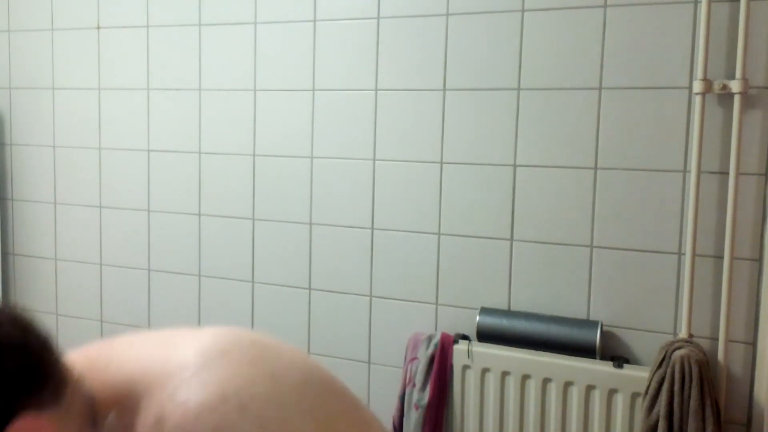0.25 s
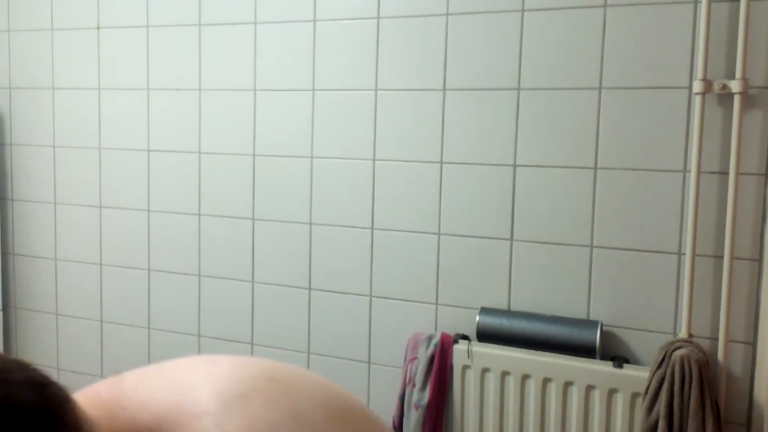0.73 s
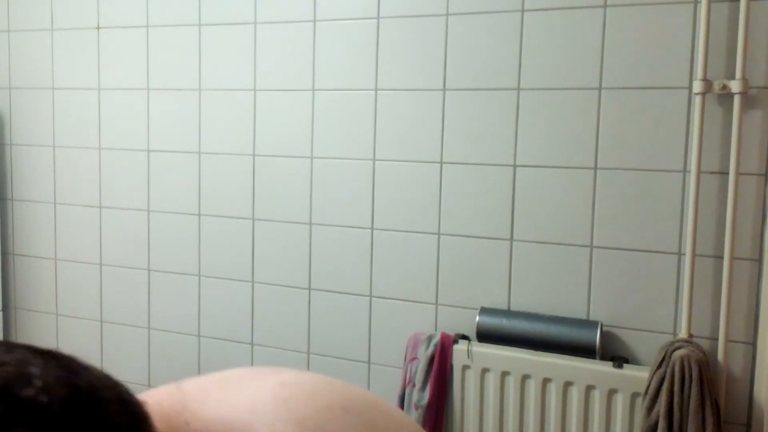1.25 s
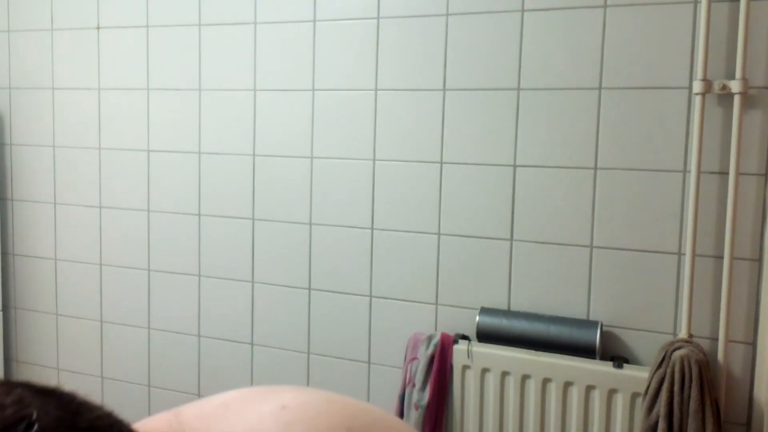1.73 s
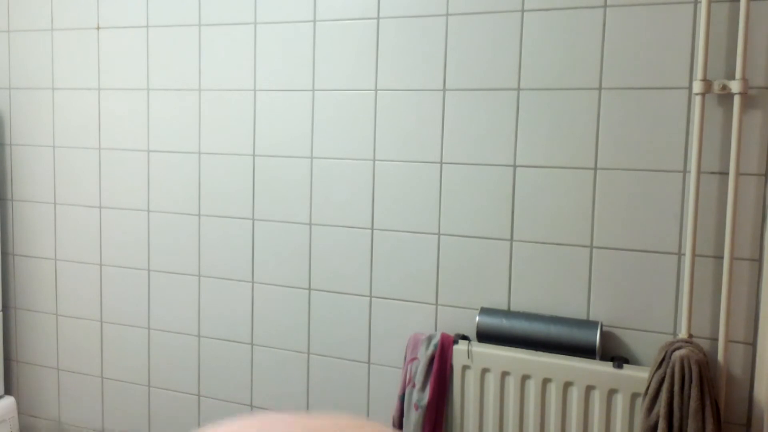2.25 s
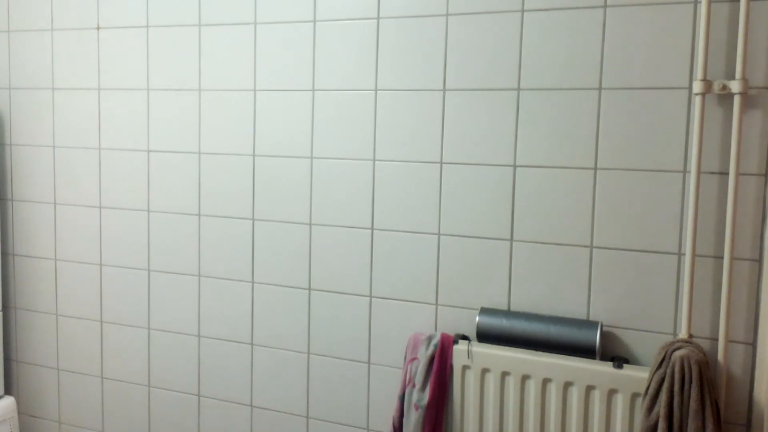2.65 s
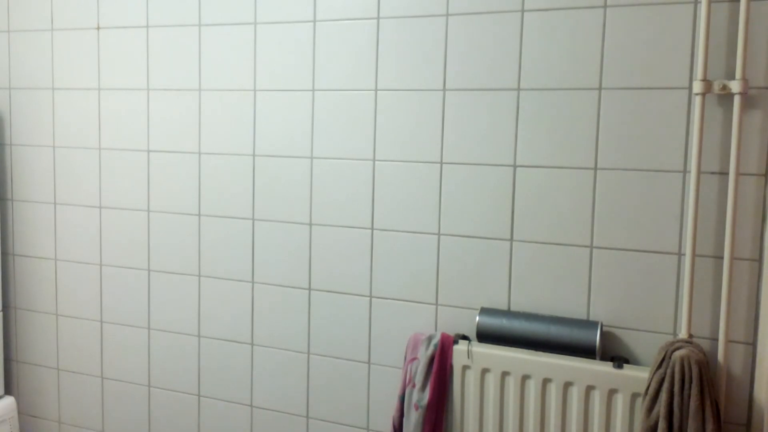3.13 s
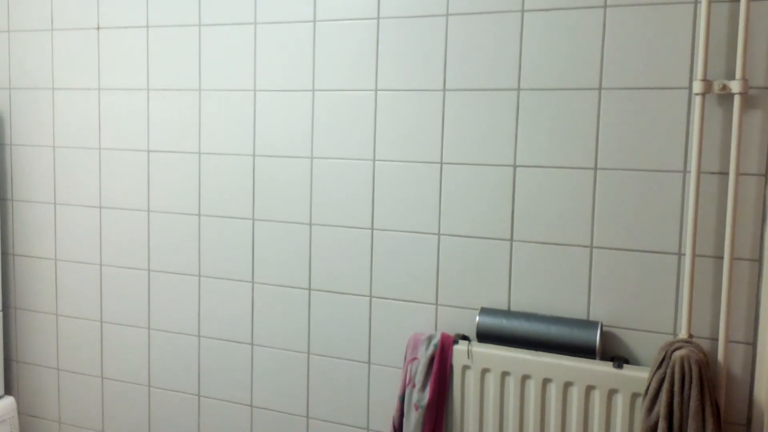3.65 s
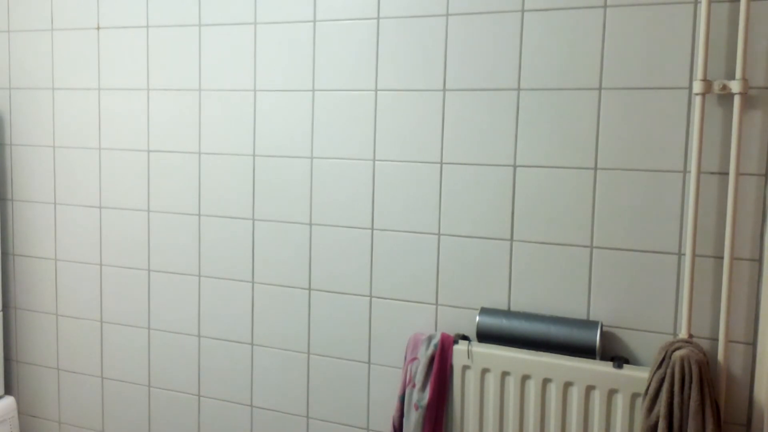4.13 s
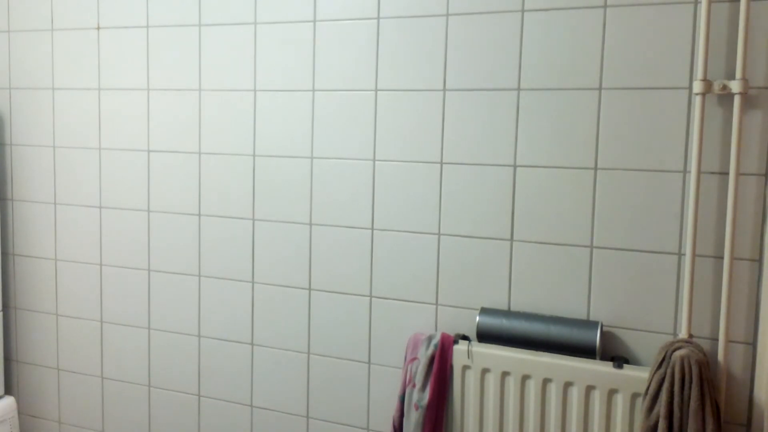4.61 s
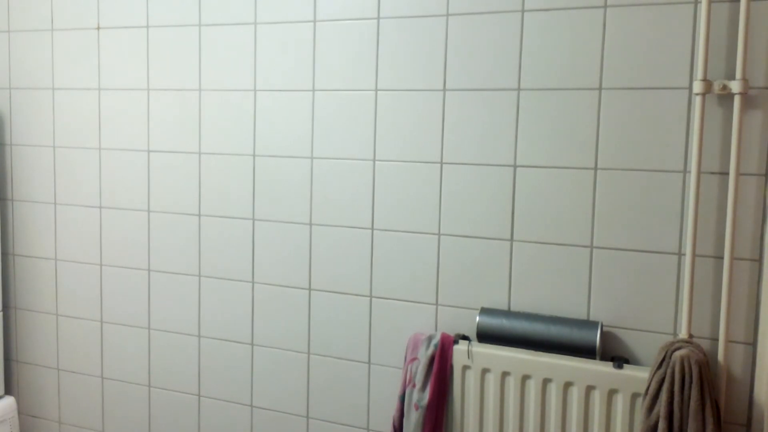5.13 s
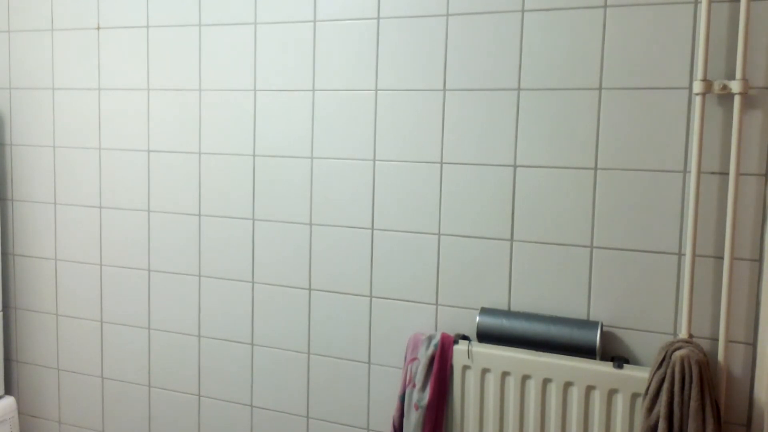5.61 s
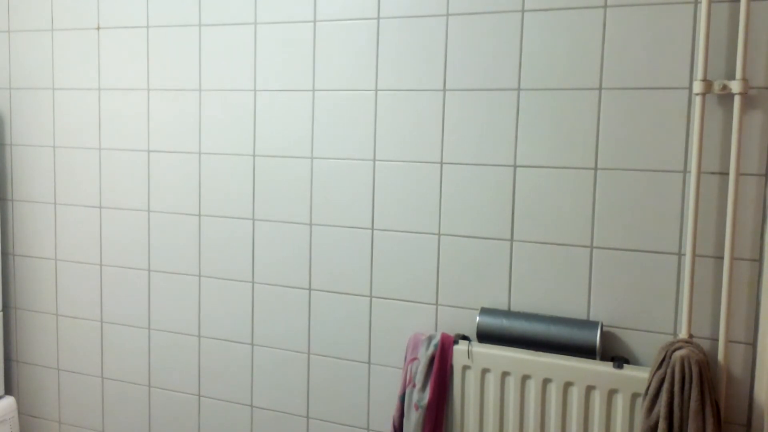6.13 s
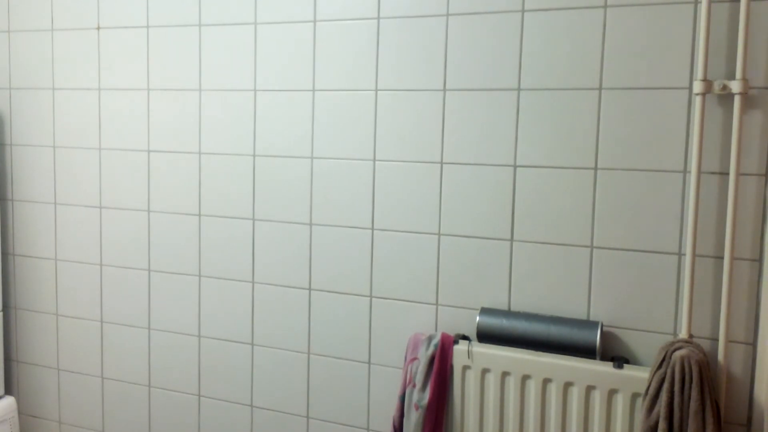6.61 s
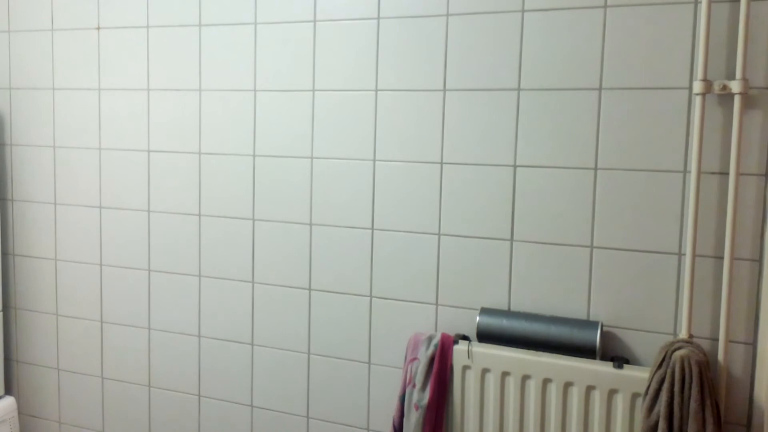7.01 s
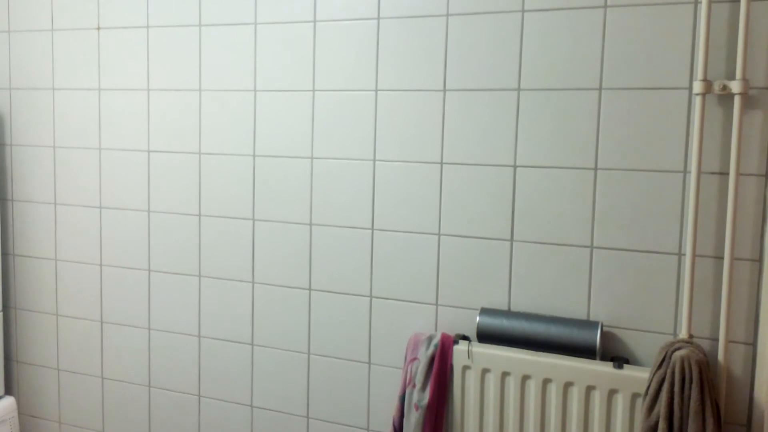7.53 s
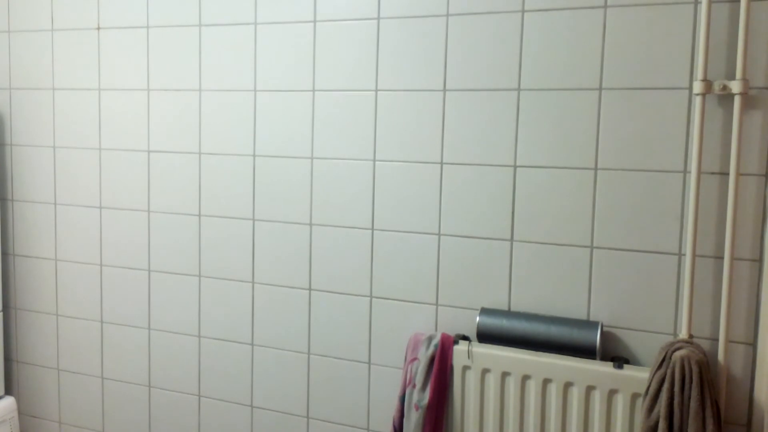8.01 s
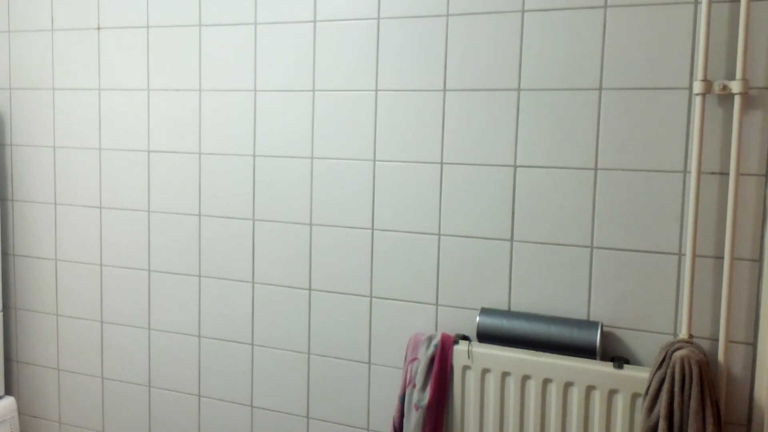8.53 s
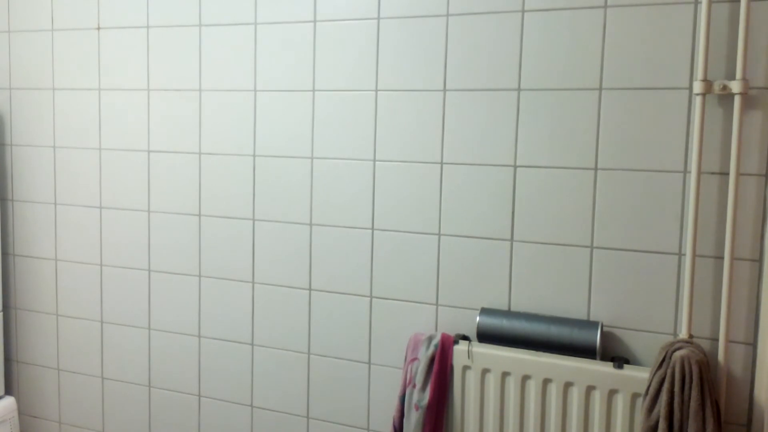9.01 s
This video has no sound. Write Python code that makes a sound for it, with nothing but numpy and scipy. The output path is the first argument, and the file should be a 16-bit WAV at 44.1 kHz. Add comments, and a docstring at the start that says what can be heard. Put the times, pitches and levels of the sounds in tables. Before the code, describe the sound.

A bathroom tap runs into a basin throughout with a bright, spattering hiss. Two strong dull knocks come early, with light splashes. The jet is then hushed for nearly two seconds while water gurgles; later knocks, dense splashes and short, repeated dips follow as something is rinsed. The tiled room is small and echoing, heard in close, slightly sharp stereo.

```python
"""A small tiled bathroom: a tap runs into a basin while something is rinsed under it.
The jet hisses and spatters (coloured noise mixed with ringing drops) and is hushed whenever it is caught.
Thrown water lands in decaying noise bursts, air bubbles plop as rising sines, the bowl sloshes and booms,
and dull knocks (a filtered crack and rattle) sound over a faint building rumble.
Standing waves and diffuse tails form the room; two unlike microphone ports pick it up."""
import sys
import numpy as np
from scipy import signal
from scipy.fft import rfft, irfft, next_fast_len
from scipy.io import wavfile

SR = 44100
rng = np.random.default_rng(int(sys.argv[2]) if len(sys.argv) > 2 else 0)


def bounce(signal):
    """Save signal as a 16-bit WAV file at the path given by the first command-line argument."""
    frames = np.transpose(np.atleast_2d(signal))
    limited = np.clip(frames, -1, 1)
    pcm = np.round(limited * 32767).astype(np.int16)
    wavfile.write(sys.argv[1], SR, pcm)


N = 408366   # samples
SIZE = next_fast_len(N + SR)   # transform length, with room for the tails
HZ = np.maximum(np.arange(SIZE // 2 + 1) * SR / SIZE, 1)
T = np.arange(N) / SR   # s


def amp(db):
    """Decibels are logarithmic: 20 dB is a factor of ten in pressure."""
    return 10 ** (np.asarray(db) / 20)


def rms_one(x):
    """Effective pressure is the root of the mean square; here it is scaled to 1."""
    return x / np.sqrt(np.mean(x ** 2) + 1e-20)


def in_time(rows):
    """Linear interpolation turns each column of a time table into one value a sample."""
    s, *columns = np.transpose(rows)
    return [np.interp(T, s, c) for c in columns]


def at_hz(points, hz=HZ):
    """Pitch is logarithmic, so a spectrum table is interpolated over log frequency."""
    table_hz, values = np.array(points).T
    return np.interp(np.log(hz), np.log(table_hz), values)


def colour(x, db):
    """Minimum phase: folding the cepstrum of a dB spectrum gives its causal filter."""
    cepstrum = irfft(db * np.log(10) / 20, SIZE)
    cepstrum[1:SIZE // 2] *= 2
    cepstrum[SIZE // 2 + 1:] = 0
    response = np.exp(rfft(cepstrum))
    return irfft(rfft(x, SIZE) * response, SIZE)[..., :N]


def drift(rate):
    """Low-passed chance: a double pole near rate (Hz) leaves slow fluctuation of rms 1."""
    step = 40   # samples between computed values
    r = np.exp(-2 * np.pi * rate * step / SR)
    chance = rng.standard_normal(N // step + 2002)
    slow = signal.lfilter([1], [1, -2 * r, r * r], chance)[2000:]   # past the filter's start
    return np.interp(np.arange(N) / step, np.arange(len(slow)), rms_one(slow))


def droplets(per_s, low_hz, high_hz, cycles, spread_db, clump_db):
    """Clumped random impacts excite damped resonators, which fall 60 dB in the given cycles."""
    bands = 30
    sizes = amp(spread_db * np.minimum(rng.exponential(1, N), 3.6)) * rng.choice([-1, 1], N)
    born = rng.random(N) < per_s * amp(clump_db * drift(15)) / SR
    dealt = rng.integers(0, bands, N)   # which resonator each drop strikes
    out = 0
    for k, hz in enumerate(np.geomspace(low_hz, high_hz, bands)):
        r = amp(-60 * hz / (max(cycles, 1) * SR))
        w = 2 * np.pi * hz / SR
        impacts = sizes * born * (dealt == k) + 1e-18
        ringing = signal.lfilter([1], [1, -2 * r * np.cos(w), r * r], impacts)
        out = out + rms_one(ringing) * np.sqrt(hz)
    return rms_one(out)


def water(level_db, spectrum, grains, share, flicker_db):
    """Incoherent sources add in power: smooth rush and a share of drops, coloured and unsteady."""
    share = np.clip(share, 0, 1)
    mix = np.sqrt(1 - share) * rng.standard_normal(N) + np.sqrt(share) * grains
    flicker = flicker_db * (drift(2.55) + 0.73 * drift(8.8))
    return amp(level_db + flicker) * rms_one(colour(mix, at_hz(spectrum)))


def add(out, s, piece):
    """Superposition: lays a short sound into out at time s."""
    i = round(s * SR)
    out[i:i + len(piece)] += piece[:N - i]


def stream():
    """Jet break-up on hands and china gives broadband spatter, fine spray and heavier patter."""
    # The freely falling jet. Each row: time in seconds, spatter level in dB, fine spray level in dB.
    flow = [(0, -24.5, -37.5), (1.8, -24.5, -36), (2.8, -26, -39.5), (4.8, -26, -40.5), (5.15, -28, -40.5),
            (5.42, -25.5, -38.5), (6.2, -29, -43.5), (6.8, -25.5, -39), (8.0, -27.5, -41),
            (9.26, -27, -38.5)]
    # Relative spectra of the three parts. Each row: frequency in Hz, density in dB per Hz.
    spatter = [(1500, -33.5), (2500, -11.5), (3500, -11.5), (5000, 0.5), (5800, 2), (6500, 2), (7200, 0),
               (8200, -20), (10000, -22.5)]
    spray = [(5000, -56), (8000, 2), (10000, 7.5), (12500, -2), (15000, -15.5), (17000, -26)]
    patter = [(300, -23), (700, -13), (1050, -12), (1400, -1.5), (2000, -3), (2800, 0), (4000, 1),
              (6000, -28.5)]
    patter_db = -11   # relative to the spatter
    spray_hush, patter_hush = 0.96, 0.42   # shares of the hush that these parts take
    flow_db, spray_db = in_time(flow)
    hush_db = hush()
    fine = droplets(900.0, 2490, 8300, cycles=19.0, spread_db=2.5, clump_db=4.0)
    heavy = droplets(600.0, 495, 4180, cycles=14.6, spread_db=4.0, clump_db=2.0)
    return (water(flow_db - hush_db, spatter, fine, share=0.2, flicker_db=0.07)
            + water(spray_db - spray_hush * hush_db, spray, fine, share=0.14, flicker_db=1.25)
            + water(flow_db + patter_db - patter_hush * hush_db, patter, heavy, share=0.41, flicker_db=0.56))


def hush():
    """Obstructed flow: dB lost while the jet is caught, then a gush of the water held back."""
    # Something is held in the jet. Each row: start in seconds, length in seconds, hush in dB.
    catches = [(2.828, 1.8, 8), (5.398, 0.6, 9), (6.29, 0.27, 7), (7.18, 0.4, 10), (8.073, 0.19, 10),
               (8.541, 0.15, 10.5)]
    cover_s, uncover_s = 0.17, 0.14   # the hush comes and goes within a fraction of a second
    gush_db, gush_s = 2.5, 0.18   # height, and time constant of its decay
    out = 0
    for s, length, db in catches:
        since = T - s - length   # s since the jet began to be let go
        covered = np.clip(np.minimum((T - s) / cover_s, 1 - since / uncover_s), 0, 1)
        released = np.clip(since / uncover_s, 0, 1)
        fading = np.exp(-np.maximum(since - uncover_s, 0) / gush_s)
        out = out + db * covered - gush_db * released * fading
    return out


def splashes():
    """Many small impacts sum to noise: a sheet of drops arrives with a snap and thins out."""
    # Thrown water lands. Each row: start in seconds, spray level in dB,
    # heavy drops relative to the spray in dB, 60 dB decay time in seconds.
    landings = [(0.339, -10, -20, 0.08), (0.449, -11.5, -30, 0.057), (0.5681, -13.5, -14, 0.044),
                (1.101, -15, -25, 0.051), (1.8443, -10, -19, 0.033), (2.3689, -12.5, -27, 0.037),
                (2.6657, -15.5, -21, 0.05), (3.665, -24, -6, 0.18), (3.712, -19, 0, 0.24),
                (3.932, -18, -23, 0.093), (4.071, -12, -32, 0.06), (4.3207, -30, 3, 0.045),
                (4.472, -20.5, -10, 0.43), (4.6212, -15, -5.5, 0.058), (4.7039, -28, 15, 0.03),
                (4.798, -17, 2, 0.08), (5.927, -22, -23, 0.12), (6.092, -13.5, -3, 0.059),
                (6.1034, -8.5, -1.5, 0.062), (6.131, -9, -0.5, 0.037), (6.2184, -30, -16, 0.05),
                (6.336, -17, -5, 0.16), (6.5126, -21, -8, 0.08), (6.6, -22, 1, 0.13),
                (6.6455, -15.5, 0, 0.076), (6.6985, -15.5, -9, 0.065), (7.5852, -22, -25, 0.05),
                (7.678, -13, -26, 0.11), (8.136, -25, 5, 0.08), (8.3468, -5.5, -30, 0.021),
                (8.371, -20.5, 1, 0.29), (8.719, -23.5, -2, 0.05), (8.9057, -14, -25, 0.041)]
    out, t = np.zeros(N), T[:SR // 2]
    spray = signal.butter(4, [4400, 7300], "band", fs=SR, output="sos")
    heavy = signal.butter(2, [2200, 4300], "band", fs=SR, output="sos")
    for s, db, heavy_db, t60 in landings:
        uneven_db = 4.6 * rng.standard_normal(len(t) // 30 + 1).repeat(30)[:len(t)]   # new every 30 samples
        thinning = amp(-60 * t / max(t60, .005))
        snap = 0.34 * np.exp(-t / 0.0058)
        drops = rng.standard_normal(len(t)) * amp(uneven_db) * (thinning + snap)
        sheet = signal.sosfilt(spray, drops) + amp(heavy_db) * signal.sosfilt(heavy, drops)
        add(out, s, amp(db) * sheet)
    return out


def slosh():
    """Resonance of bubbles and bowl: low surge and gurgle swell over a calm level."""
    # Relative spectra of deep surge and gurgle. Each row: frequency in Hz, density in dB per Hz.
    surge = [(25, -21), (45, 2), (80, 4.5), (100, -8.5), (128, 4.5), (170, 13.5), (220, -18.5)]
    gurgle = [(150, -19), (230, 0), (280, 1), (400, 1), (600, -4), (900, -1), (1400, -43.5)]
    surge_db = swells(calm_db=-72, column=2)
    gurgle_db = swells(calm_db=-61, column=3)
    bubbles = droplets(90.0, 174, 1270, cycles=9.2, spread_db=4.0, clump_db=1.5)
    return (water(surge_db, surge, bubbles, share=0.16, flicker_db=2.0)
            + water(gurgle_db, gurgle, bubbles, share=0.91, flicker_db=2.5))


def swells(calm_db, column):
    """Exponential decay is linear in dB: each swell rises, holds and settles back to calm."""
    # The bowl is stirred, or its body booms on just after a hard knock. Each row: start of the hold
    # in seconds, its length in seconds, deep surge level in dB, gurgle level in dB.
    bowl = [(0.722, 0.048, -48, -32), (1.86, 0.035, -54, -33.5), (3.383, 0.12, -47, -58),
            (3.633, 0.046, -47, -42), (4.3, 0.22, -61, -57), (4.58, 0.086, -44.5, -47),
            (4.83, 0.11, -53.5, -45), (5.78, .05, -55, -37.5), (6.538, 0.23, -53.5, -44),
            (7.62, 0.18, -61, -47.5), (8.326, 0.14, -64, -44.5), (8.846, 0.37, -54, -51.5)]
    rise_s, settle_db_per_s = 0.12, 168
    level = np.full(N, float(calm_db))
    for row in bowl:
        s, length, top_db = row[0], row[1], row[column]
        rise = calm_db + (top_db - calm_db) * np.clip(1 + (T - s) / rise_s, 0, 1)
        settling = settle_db_per_s * np.maximum(T - s - length, 0)
        level = np.maximum(level, rise - settling)
    return level


def plops():
    """A trapped bubble is a damped oscillator, its pitch climbing as it nears the surface."""
    # Trapped air pops. Each row: start in seconds, level before swell and decay in dB, starting pitch in Hz.
    pops = [(2.268, -20.5, 1170), (2.966, -21.5, 107), (2.999, -22, 112), (3.207, -31.5, 245),
            (3.375, -20, 257), (3.433, -22.5, 1095), (3.6, -29.5, 634), (3.664, -17, 563),
            (4.357, -28, 337), (4.419, -31, 330), (4.479, -35, 340), (4.588, -17, 83), (4.636, -14, 123),
            (4.679, -21.5, 249), (4.796, -18, 1710), (4.823, -18, 370), (4.929, -23, 640),
            (4.949, -18.5, 800), (5.219, -22, 1680), (5.339, -28, 890), (5.687, -22, 770),
            (6.029, -34, 344), (6.124, -20, 404), (6.534, -14.5, 490), (6.599, -22, 250),
            (6.689, -28, 1170), (6.739, -22, 295), (6.799, -22, 840), (7.098, -28, 1125),
            (7.577, -18.5, 315), (7.662, -21.5, 555), (7.73, -20, 1390), (7.779, -24.5, 790),
            (8.268, -13, 318), (8.27, -24.5, 1170), (8.391, -21.5, 250), (8.818, -30, 238),
            (8.867, -13.5, 1015), (8.889, -20.5, 1143), (9.001, -25.5, 232), (9.146, -22, 120)]
    climb = 5.2   # octaves per s
    out, t = np.zeros(N), T[:SR // 6]
    for s, db, hz in pops:
        pitch = hz * 2 ** (climb * t)
        t60 = 0.027 * (400 / hz) ** 0.16   # s; big low bubbles ring a little longer
        swell = 1 - np.exp(-1.6 * hz * t)   # time constant of about 0.6 cycle
        ringing = np.sin(2 * np.pi * np.cumsum(pitch) / SR)
        add(out, s, amp(db - 60 * t / max(t60, .005)) * swell * ringing)
    return out


def knocks():
    """An impulse excites a band-limited body: sharp crack, blunt blow and short rattle."""
    # Dull knocks on the basin. Each row: time in seconds, dry peak level in dB,
    # upper cut-off in Hz, rattle length in seconds.
    blows = [(0.667, -4, 1210, 0.038), (1.813, -4.5, 1580, 0.042), (3.648, -26, 785, 0.0093),
             (4.855, -14, 1370, 0.0089), (5.764, -5, 1320, 0.018)]
    out, t = np.zeros(N), T[:SR // 4]
    hollow = signal.butter(6, 300, "high", fs=SR, output="sos")
    bright = signal.butter(2, [1000, 2800], "band", fs=SR, output="sos")
    thud = signal.butter(2, [105, 165], "band", fs=SR, output="sos")
    for s, db, top_hz, length in blows:
        rattle = 0.65 * rng.standard_normal(len(t)) * np.exp(-(t / max(length, .002)) ** 4)
        rattle[0] += 9.0   # the impact itself
        dull = signal.butter(2, top_hz, fs=SR, output="sos")
        blow = signal.sosfilt(np.vstack([hollow, dull]), rattle)
        blow = blow + 0.094 * np.exp(-t / 0.0017) * signal.sosfilt(bright, rattle)   # crack
        blow = blow + 0.13 * signal.sosfilt(thud, rattle)   # a little of the blow goes into the wall
        add(out, s - .001, amp(db) * blow / np.abs(blow).max())
    return out


def building_rumble():
    """Stationary noise, shaped in spectrum, stands for the faint rumble of the building."""
    # Relative rumble spectrum. Each row: frequency in Hz, density in dB per Hz.
    rumble = [(25, 15), (60, -23), (130, 9), (300, -5), (1000, -24), (4000, -29)]
    return amp(-72.5) * rms_one(colour(rng.standard_normal(N), at_hz(rumble)))


def bathroom(x, echo_db, count, dense_hz=520):
    """Modal and diffuse fields: discrete standing waves in the bass, dense tails above."""
    # Standing waves between the tiles. Each row: frequency in Hz, level over the direct sound in dB,
    # 60 dB decay time in seconds.
    standing = [(79, 10.5, 0.68), (101.6, 10.5, 0.36), (125.6, 13, 0.55), (157.7, 11.5, 0.52),
                (259, 9, 0.25), (283, 10, 0.33), (341.5, 3, 0.085), (384, 14, 0.38), (500, -9.5, 0.38),
                (543, 8.5, 0.16), (633, 8, 0.14), (689, 14.5, 0.39), (807, 10, 0.31), (902, 17, 0.19),
                (1060, -3, 0.72), (1125, 16.5, 0.37), (1205, 13.5, 0.078), (1303, 14.5, 0.22),
                (1444, 7.5, 0.2), (1802, 11.5, 0.45)]
    # Likeness of the two ports. Each row: frequency in Hz, likeness from 0 to 1.
    likeness = [(40, 0.9), (125, 0.64), (300, 1), (600, 0.26), (1100, 0), (2500, 0), (6000, 0),
                (12000, 0.12)]
    # Phase of the shared field at the right port. Each row: frequency in Hz, phase in radians.
    right_phase = [(100, -0.35), (400, 0), (700, 0.6), (1030, 2), (1600, 18), (2900, -20), (6000, 0)]
    direct = 1
    for k, (hz, db, t60) in enumerate(standing):
        direct = direct + (-1) ** k * amp(db) / (1 + 2j * np.pi * (HZ - hz) * t60 / np.log(1000))
    dense = 1j * HZ / dense_hz / (1 + 1j * HZ / dense_hz)   # the tail is diffuse only where modes crowd
    # the sound comes from ever-changing spots, each with its own echoes and its own lag to the right port
    spots = np.array([drift(70.0) ** 2 for k in range(count)]) + 1e-9
    paths = 0
    for spot in np.sqrt(spots / spots.sum(axis=0)):   # the spots share the power
        lagged = np.exp(-2j * np.pi * HZ * rng.uniform(-0.000386, 0.000375))   # lag in s
        response = amp(echo_db) * diffuse_tails() + [0 * lagged, lagged]
        paths = paths + rfft(x * spot, SIZE) * response
    left = rfft(x, SIZE) * direct + dense * paths[0]
    alike = np.clip(at_hz(likeness), 0, 1)
    shared = alike * left * np.exp(1j * at_hz(right_phase))
    right = shared + np.sqrt(1 - alike ** 2) * dense * paths[1]
    return irfft(np.array([left, right]), SIZE)[:, :N] / np.sqrt(1 + amp(2 * echo_db))


def diffuse_tails():
    """Reverberant decay: spectra of two unrelated unit-energy tails that die band by band."""
    # Reverberation time. Each row: frequency in Hz, 60 dB decay time in seconds.
    room_t60 = [(100, 0.83), (300, 0.39), (700, 0.37), (1500, 0.34), (4000, 0.27), (9000, 0.19),
                (16000, 0.25)]
    t, tails = T[:SR * 2 // 3], 0
    white = rng.standard_normal((2, len(t)))
    build_up = 1 - np.exp(-t / 0.0036)
    for low in 40 * 2. ** np.arange(9):   # octave bands
        high = min(2 * low, .45 * SR)
        band = signal.sosfilt(signal.butter(2, [low, high], "band", fs=SR, output="sos"), white)
        tails = tails + band * amp(-60 * t / at_hz(room_t60, low * 1.38)) * build_up
    return rfft(tails / np.sqrt(np.sum(tails ** 2, axis=1, keepdims=True)), SIZE)


def scene():
    """Superposition in one room: water all over the bowl, single blows and a faint rumble."""
    spread_out = stream() + slosh() + building_rumble()
    single = splashes() + plops() + knocks()
    return bathroom(spread_out, echo_db=2.0, count=6) + bathroom(single, echo_db=-0.95, count=1)


def record(dry):
    """Transducer response: each port has its own colour, peaks saturate and the top is cut."""
    # The left port has a tube resonance near 6.5 kHz. Each row: frequency in Hz, left over right in dB.
    port_colour = [(60, -3.5), (330, 2.5), (520, 6.5), (1170, -6), (1800, 3.5), (4200, 3), (5600, 7.5),
                   (6500, 17.5), (7400, 3.5), (8400, 0.5), (10000, -3.5), (15000, -10)]
    half_db = at_hz(port_colour) / 2
    ports = irfft(rfft(dry, SIZE) * amp([half_db, -half_db]), SIZE)[:, :N]
    rounded = 2.083 * np.tanh(ports / 1.55)
    top_cut = signal.cheby2(20, 80, 16100, fs=SR, output="sos")   # 80 dB down from 16100 Hz
    return signal.sosfilt(top_cut, rounded)


dry = scene()
out = record(dry)
bounce(out)
```